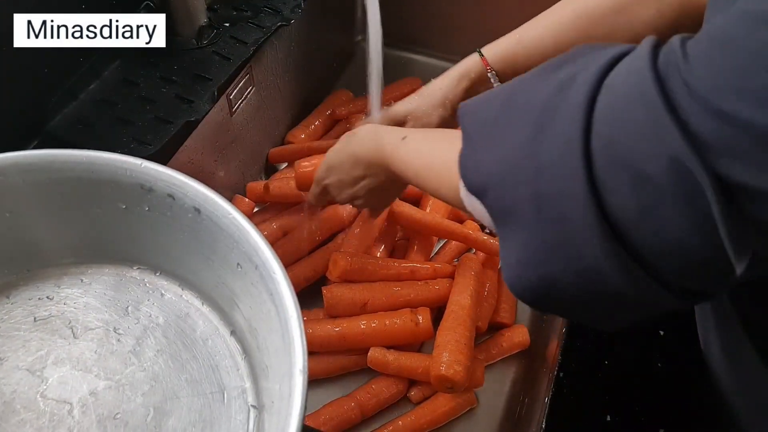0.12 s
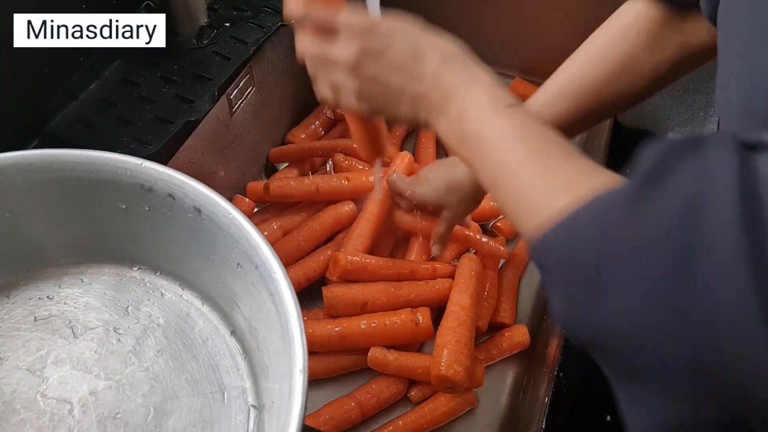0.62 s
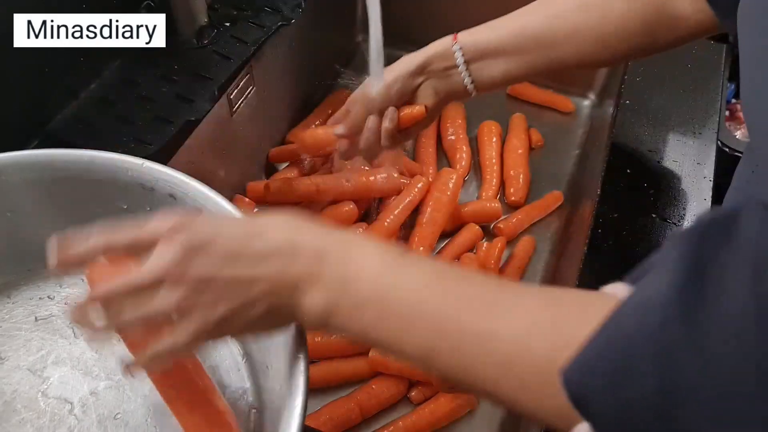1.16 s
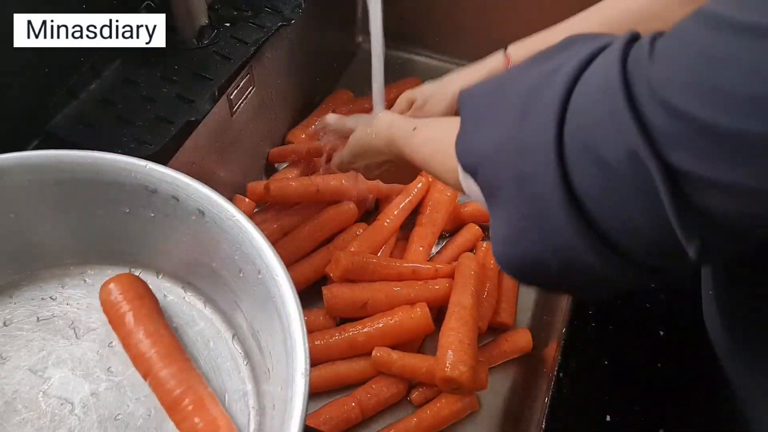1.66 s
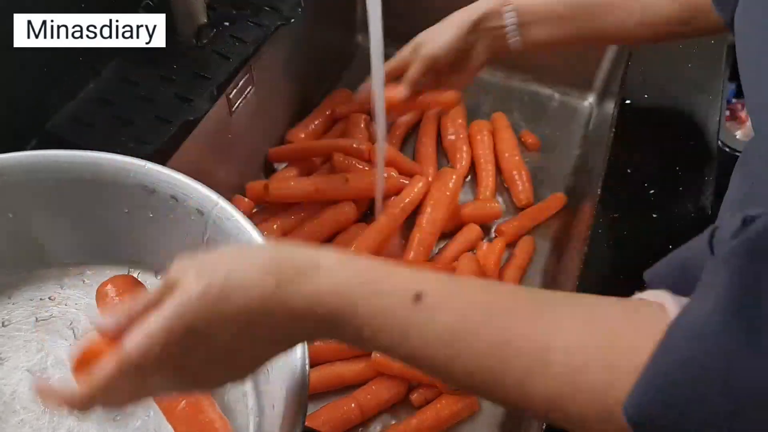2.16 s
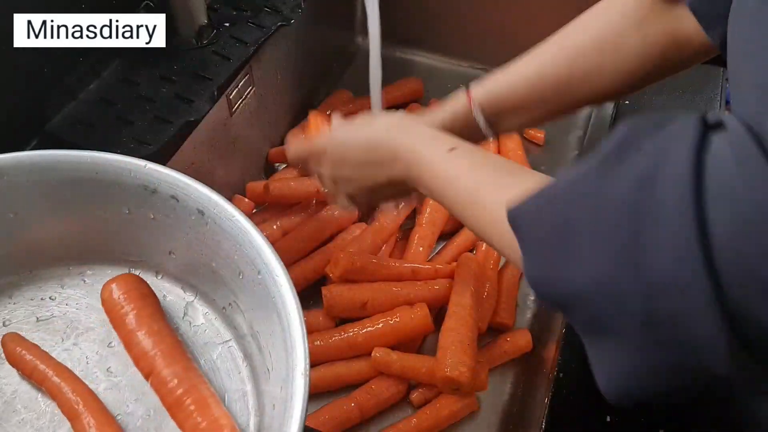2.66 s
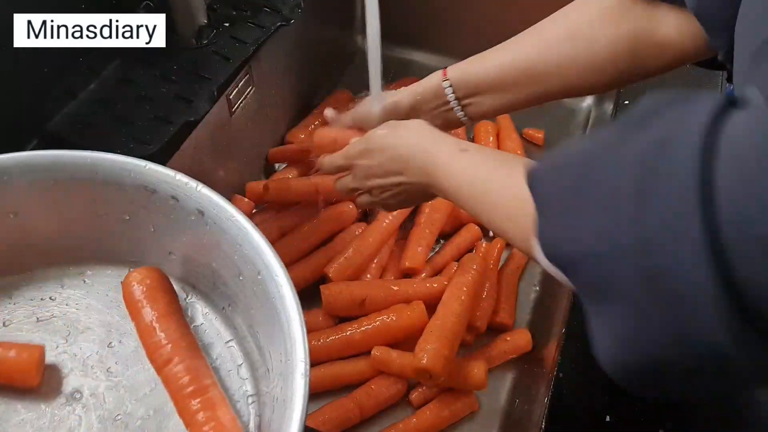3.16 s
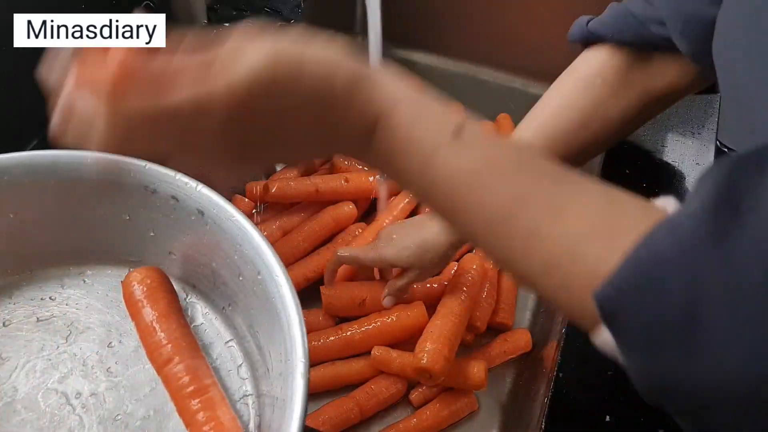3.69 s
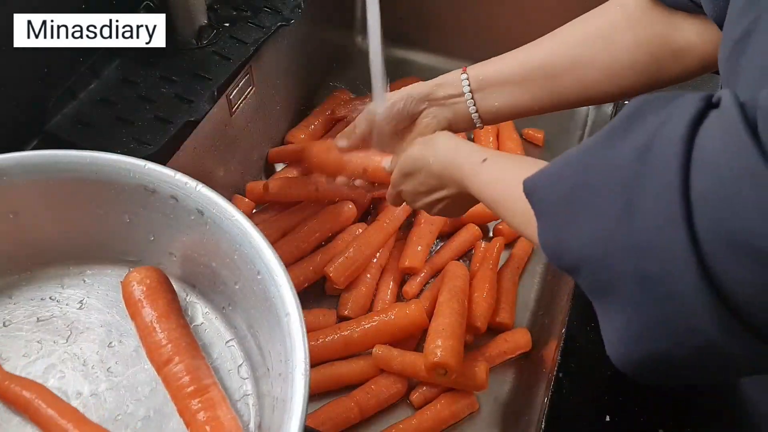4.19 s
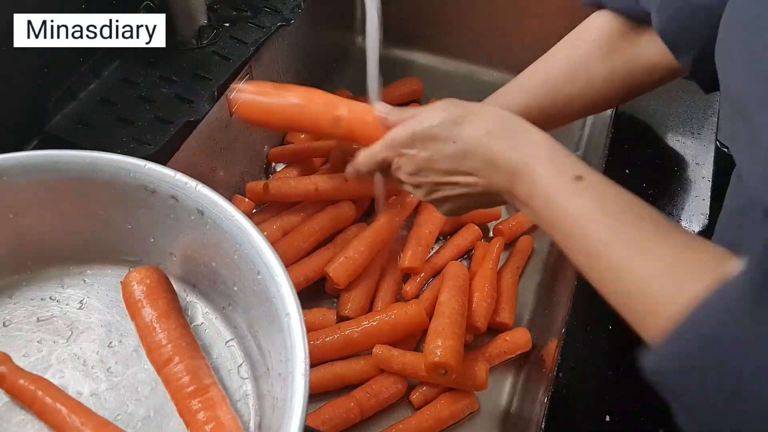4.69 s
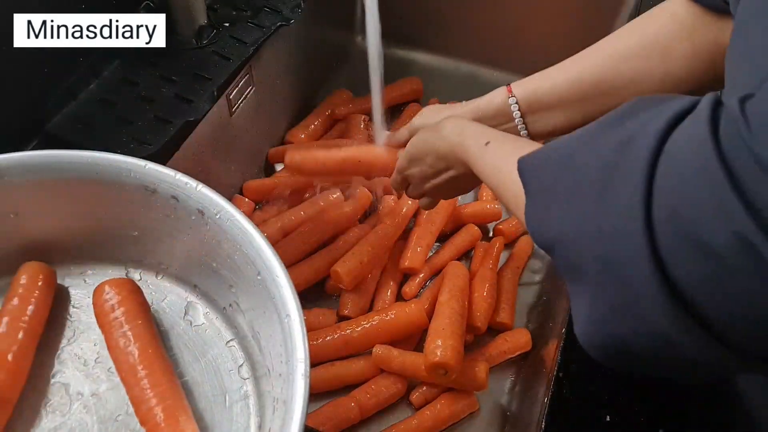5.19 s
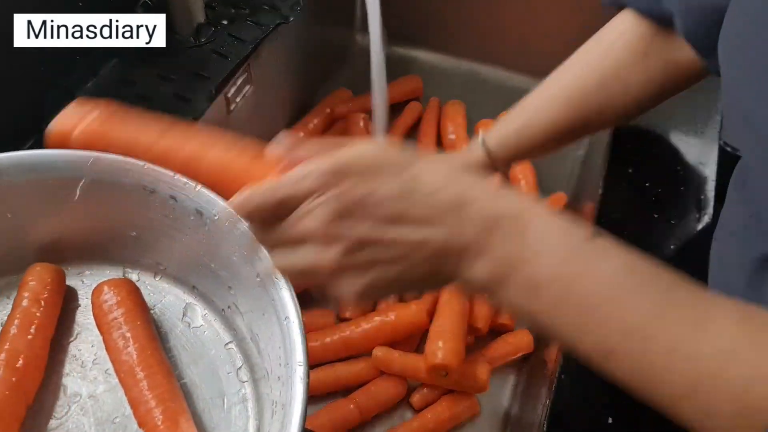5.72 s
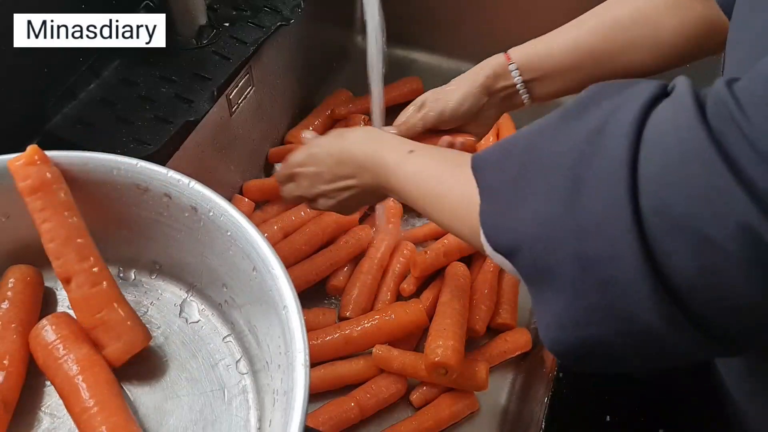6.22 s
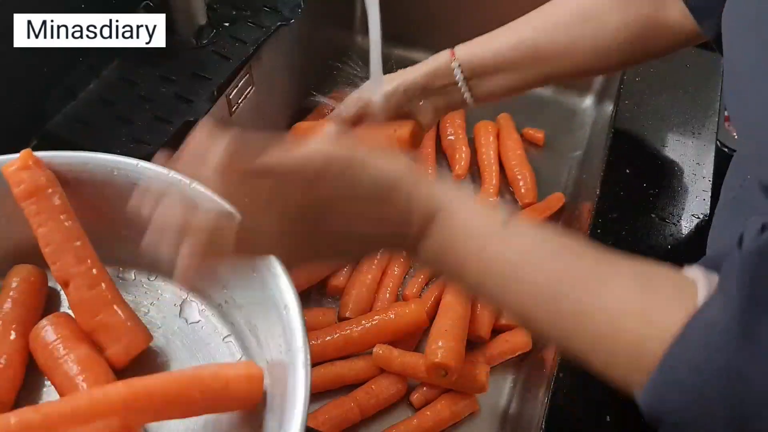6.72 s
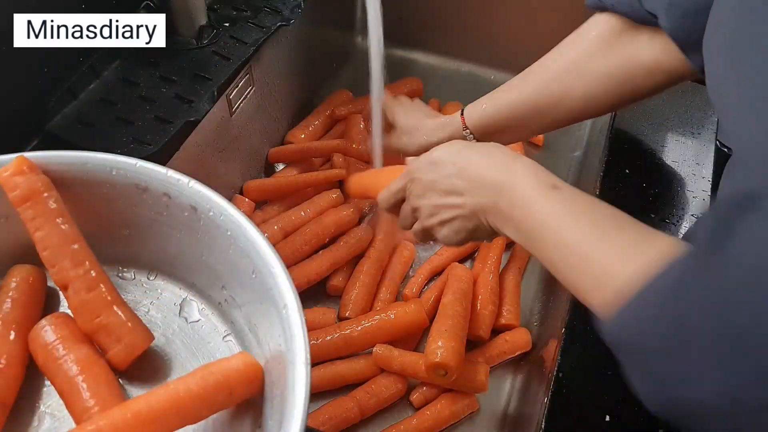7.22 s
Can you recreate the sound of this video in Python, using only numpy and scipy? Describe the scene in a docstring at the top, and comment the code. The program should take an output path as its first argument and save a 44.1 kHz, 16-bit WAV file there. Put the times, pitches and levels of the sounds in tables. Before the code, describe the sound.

For the first 1.4 s the tap is very faint, a thin distant hiss with tiny bubbles and barely audible pot bumps. Then the level leaps and a bright, dense rush of water fills the stereo field, staying to the end at 7.4 s, surging slightly as hands rinse carrots, with soft gurgle and low drumming of the steel. Carrots fall into a thin metal pot: hollow knocks at 2.2-2.4 s, a clattering bounce and roll at 3.0-3.2, another cluster at 3.8-4.0, thuds at 4.9-5.1, clunks at 5.9-6.0, and a strong hit near 6.8. Each is short and damped, with a low boom. Crisp sprays flick off the hands, busiest at 3.8-4.9 and 5.6-6.8, the strongest with the 6.8 hit. Rising bubble bloops appear around 2.0, 3.75 and 7.3 s. Close microphone, short hard-room reflections.

```python
"""Rinsing carrots at a sink

A tap runs over hands and carrots in a steel sink: coloured noise and swarms of damped sines, with basin drumming.
Bursts of filtered noise splat off the hands; single bubbles are sines that rise in pitch.
Carrots drop into a thin metal pot on the left and knock, bounce and roll: damped modes shaped by each contact.
The whole scene starts faint and jumps up in level after a second and a half."""
import sys
import numpy as np
from scipy import signal
from scipy.fft import rfft, irfft, next_fast_len
from scipy.io import wavfile
from scipy.ndimage import uniform_filter1d, map_coordinates

SR = 44100
rng = np.random.default_rng(int(sys.argv[2]) if len(sys.argv) > 2 else 0)


def bounce(signal):
    """Save signal as a 16-bit WAV file at the path given by the first command-line argument."""
    frames = np.transpose(np.atleast_2d(signal))
    limited = np.clip(frames, -1, 1)
    pcm = np.round(limited * 32767).astype(np.int16)
    wavfile.write(sys.argv[1], SR, pcm)


def convert_level_to_amplitude(level_db):
    """Map a level in decibels to its linear amplitude factor."""
    exponent = np.asarray(level_db, float) / 20
    return 10 ** exponent


N = 324576


def unit(x):
    """Scaled to rms 1."""
    return x / np.sqrt(np.mean(x ** 2) + 1e-20)


def along(points, hz):
    """(Hz, value) points read on a log frequency axis."""
    point_hz, value = np.transpose(points)
    return np.interp(np.log(hz + 1), np.log(point_hz + 1), value)


def wobble(knots_per_s):
    """A smooth random curve through normal knots."""
    knots = rng.standard_normal(int(N * knots_per_s / SR) + 4)
    return map_coordinates(knots, [np.arange(N) * knots_per_s / SR])


# left-right likeness: pitch_hz, likeness (1 = identical)
LIKENESS = [(25, 0.9), (70, 0.95), (180, 1), (300, 0.91), (550, 0.95), (1650, 0.23), (4970, 0.18),
            (15000, 0.026)]


def likeness_angle(hz):
    """Mid-side mixing angle that gives the left-right likeness at each frequency."""
    return np.arccos(np.clip(along(LIKENESS, hz), 0, 1)) / 2


def paired(pair, spectrum):
    """Two unrelated signals coloured and mixed into left and right, rms 1."""
    size = next_fast_len(N + 8192)
    hz = np.fft.rfftfreq(size, 1 / SR)
    angle = likeness_angle(hz)
    coloured = rfft(pair, size) * convert_level_to_amplitude(along(spectrum, hz))
    mid, side = irfft(coloured * [np.cos(angle), np.sin(angle)], size)[:, :N]
    return unit(np.array([mid + side, mid - side]))


def patchy(depth_db):
    """Two noises sharing small patches of random gain in time and pitch."""
    z = signal.stft(rng.standard_normal((2, N)), nperseg=256)[2]
    field = uniform_filter1d(rng.standard_normal(z.shape[1:]), size=9, axis=0)
    field = uniform_filter1d(field, size=7, axis=1)
    return unit(signal.istft(z * convert_level_to_amplitude(depth_db * unit(field)), nperseg=256)[1][:, :N])


def bubbles(count, centre_hz, spread, cycles, size_db):
    """Damped sines that rise in pitch as each bubble nears the surface; two unrelated swarms."""
    when, pitch, size, side = rng.random((count, 4)).T[..., None]
    hz = centre_hz * np.exp(spread * (2 * pitch - 1))
    k = np.arange(700)
    u = k / SR * hz / cycles  # time in decay constants
    tone = np.sin(2 * np.pi * cycles * u * (1 + 0.017 * u))
    envelope = np.exp(-u) * (1 - np.exp(-5 * u))
    wave = convert_level_to_amplitude(-size_db * np.log(size + 0.0033)) * tone * envelope
    wave = wave * np.hanning(2 * len(k))[len(k):]
    at = (when * (N - len(k))).astype(int) + k + N * (side > .5)
    return unit(np.bincount(at.ravel(), wave.ravel(), 2 * N).reshape(2, N))


# stream breaking on hands and carrots: time_s, splash_db, droplet_fineness_db
FLOW_CURVE = [(0, -68.5, -2), (.1, -63, -7), (.27, -66.5, -6), (.53, -61, -1.5), (.58, -69, -8.5),
              (.61, -59, 0), (.79, -60, -8), (.93, -64, -4.5), (1.2, -60, -8), (1.27, -63.5, -5),
              (1.42, -63.5, -8), (1.43, -43, 2), (1.48, -44.5, 2.5), (1.61, -44, 2), (1.97, -41.5, -2.5),
              (2.09, -41.5, 0.5), (2.27, -40.5, 0.5), (2.47, -44, 3.5), (2.7, -45, 0.5), (3.06, -41.5, 1.5),
              (3.26, -46.5, 2), (3.48, -43, 0), (3.64, -41, -0.5), (4.06, -43.5, 5.5), (4.62, -42.5, 0.5),
              (4.81, -41.5, 1.5), (5.33, -43, 1.5), (5.74, -42.5, 3.5), (6.09, -43, 1), (6.68, -40.5, 4),
              (7.11, -42, 1), (7.36, -41, 2)]
# layer colours: pitch_hz, density_db (relative, per Hz)
SPRAY_COLOUR = [(1060, -15.5), (1800, -4), (1960, -15.5), (2150, -3), (2620, -1.5), (3400, -1),
                (3770, -3.5), (4420, -1.5), (5940, -2.5), (7000, -5), (9100, -11), (15400, -120)]
FIZZ_COLOUR = [(3530, -26), (6000, -3.5), (7740, -2.5), (8370, -0.5), (10700, -3.5), (11600, -5),
               (12800, -2), (15100, -4), (16000, -16)]
GURGLE_COLOUR = [(380, -33), (650, -6.5), (907, -7), (1040, -3), (1240, -11.5), (1920, -6), (2100, 0.5),
                 (2730, -13), (4620, -120)]
FAINT_GURGLE_COLOUR = [(240, -58), (400, -29), (1160, -6.5), (1230, -7), (1340, -11), (1460, -7),
                       (2100, -15), (2730, -52), (4620, -120)]
DRUM_COLOUR = [(94, -30), (160, -9.5), (216, 1.5), (291, -8), (366, -18.5), (496, -5.5), (552, -19),
               (650, -12.5), (840, -29), (1430, -120)]
RUMBLE_COLOUR = [(15, -48), (25, -29), (43, -25), (70, -10), (78, -8), (91, 5), (160, -3), (210, -53),
                 (350, -120)]
JUMP_S = 1.425
USUAL_DB = -43  # splash level at which the layer levels are given
# layer: level_db at the usual splash, gain_db per splash_db
SPRAY_LAW, FIZZ_LAW, GURGLE_LAW = (-44, 0.99), (-42, 0.99), (-54, 0.75)
DRUM_LAW, RUMBLE_LAW = (-53.5, 1.14), (-60.5, 0.64)


def stream():
    """Falling water: hiss with bubbles in it, surging as the hands break the flow."""
    t = np.arange(N) / SR
    time_s, splash_points_db, fine_points_db = np.transpose(FLOW_CURVE)
    splash_db = np.interp(t, time_s, splash_points_db)
    fine_db = np.interp(t, time_s, fine_points_db)

    def follow(law):
        return law[0] + law[1] * (splash_db - USUAL_DB)

    surge_db = 0.25 * wobble(10) + 1.78 * wobble(30)
    spray_bubbles = bubbles(count=5000, centre_hz=3787, spread=0.691, cycles=42, size_db=2.5)
    spray = paired(patchy(1.86) + 0.28 * spray_bubbles, SPRAY_COLOUR)
    fizz_bubbles = bubbles(count=3000, centre_hz=9555, spread=0.56, cycles=35, size_db=2.5)
    fizz = paired(patchy(1.96) + 0.3 * fizz_bubbles, FIZZ_COLOUR)
    # single drops snap on skin and steel
    ticks = paired(bubbles(count=250, centre_hz=5440, spread=0.55, cycles=1.5, size_db=4.0), SPRAY_COLOUR)
    faint_gurgle = paired(patchy(1.3), FAINT_GURGLE_COLOUR)
    full_gurgle = paired(patchy(1.7), GURGLE_COLOUR)
    gurgle = np.where(t < JUMP_S, faint_gurgle, full_gurgle)
    # lumps of water thump the sheet metal
    drum = paired(patchy(0.29), DRUM_COLOUR) * convert_level_to_amplitude(3.2 * wobble(14))
    rumble = paired(patchy(1.8), RUMBLE_COLOUR)

    rock_drum, rock_rumble = rocking(t)
    out = convert_level_to_amplitude(follow(SPRAY_LAW) - fine_db / 2 + 1.14 * surge_db) * (spray + 0.22 * ticks)
    out += convert_level_to_amplitude(follow(FIZZ_LAW) + fine_db / 2 + 1.04 * surge_db) * fizz
    out += convert_level_to_amplitude(follow(GURGLE_LAW) + 0.17 * surge_db) * gurgle
    out += np.hypot(convert_level_to_amplitude(follow(DRUM_LAW)), rock_drum) * drum
    out += np.hypot(convert_level_to_amplitude(follow(RUMBLE_LAW)), rock_rumble) * rumble
    return out


# pot handled and rocking on the counter: start_s, drum_db, rumble_db, hold_s
POT_ROCKS = [(0.755, -88, -62, 0.027), (1.01, -66, -57, 0.031), (1.263, -73, -52, .02),
             (1.354, -51, -51, .05), (1.44, -47, -60, 0.016), (2.093, -61, -56, .2),
             (2.287, -43, -61, 0.03), (2.988, -46, -42, 0.057), (3.86, -41, -40.5, .05),
             (4.08, -48, -63, 0.015), (4.808, -57, -44, .06), (4.94, -38.5, -42, 0.043),
             (5.713, -51, -44.5, .04), (5.894, -34, -45.5, 0.018), (6.164, -48, -63, 0.051),
             (6.528, -40.5, -48, 0.038), (6.818, -52, -42, 0.062), (7.186, -61, -64, 0.026)]
SWELL_DB_PER_S, SETTLE_DB_PER_S = 124, 165


def rocking(t):
    """Gains of drumming and rumble: each rock of the pot swells, holds and settles."""
    start_s, drum_db, rumble_db, hold_s = np.transpose(POT_ROCKS)[..., None]
    swell_db = -SWELL_DB_PER_S * np.maximum(start_s - t, 0)
    settle_db = -SETTLE_DB_PER_S * np.maximum(t - start_s - np.abs(hold_s), 0)
    peak = convert_level_to_amplitude(np.array([drum_db, rumble_db])[..., 0])
    return np.sqrt(peak ** 2 @ convert_level_to_amplitude(swell_db + settle_db) ** 2)


# modes of the pot: pitch_hz, level_db (relative), t60_s
POT_MODES = [(93.8, -9.5, 0.26), (139, -7.5, 0.31), (217.6, 2.5, 0.12), (239.6, 1.5, 0.18), (283, 0, 0.12),
             (460.7, -1.5, 0.11), (523, -7.5, 0.14), (707, -2.5, 0.05), (850.6, 2.5, 0.05), (971, -2, 0.12),
             (1110, -41, 0.14), (1250, -12, 0.027), (1376, -1, 0.057), (1428, -4.5, 0.049),
             (1710, -2.5, 0.052), (1864, -10, 0.097), (2160, -16, 0.21), (2440, 3.5, 0.027),
             (2870, -8, 0.027), (3320, -12, 0.066), (3860, -11, 0.054), (3946, -8, 0.064),
             (4530, -9, 0.016)]
# carrots on the pot: start_s, level_db (relative); thud_db, wall_db, crack_db (against level_db)
CARROT_KNOCKS = [(0.972, -49, 3, -20, -9), (1.205, -45, 6, -11, -3.5), (1.288, -29, 1.5, 1.5, -10.5),
                 (1.431, -40, 6.5, -2, -17), (2.111, -42.5, 6.5, -14, -1), (2.157, -23.5, -14, -34, -26),
                 (2.241, -13.5, -18, -13, -20), (2.255, -14, -13.5, -22, -21), (2.325, -29.5, -6, -16, -22),
                 (2.393, -5, -36, -5.5, -4.5), (2.424, -18, -18, 1.5, -18), (2.969, -13, -10.5, -7.5, -15),
                 (3, -14.5, -21, -9, -31), (3.018, -30, 0, 7.5, -20), (3.045, -18, -12.5, -27, -22),
                 (3.077, -23.5, -18, -10, -23), (3.116, -11.5, -26, 4.5, -5), (3.125, -19, -11.5, 1, -2.5),
                 (3.155, -17.5, -37, -0.5, -18), (3.162, -11, -24.5, -14, -18),
                 (3.185, -19.5, -30, -5, -18), (3.805, -43.5, 9, -9, -1), (3.843, -16.5, -2.5, -11, -20.5),
                 (3.886, -8, -13, -4, -20), (3.926, -9.5, -31, 1, -9), (3.941, -22.5, -10, 14, -24),
                 (3.95, -33, -3, -4, -16), (3.967, -16.5, -16, -3, -14), (3.98, -14.5, -13.5, 6.5, 1),
                 (4.015, -17.5, -16, -3.5, -11.5), (4.109, -33.5, -14, -16, -20), (4.795, -49.5, 13, -7, 0),
                 (4.858, -48, 11.5, -6, -3), (4.922, -16, 0, -16, -19), (4.937, -22.5, -6, 0, -12),
                 (4.953, -21.5, -1, -14, -17), (4.981, -19.5, -16, -12, -24), (5.064, -14.5, -17, -11, -19),
                 (5.073, -8.5, -13.5, -7.5, -15.5), (5.699, -32, 3, -14, -10), (5.734, -40.5, -7, -5, 0),
                 (5.865, -10, -10.5, -2, -18), (5.877, -15.5, -30, -1, -7), (5.889, -9.5, -9.5, -16, -16.5),
                 (6.007, -4.5, -24.5, -10, -27.5), (6.028, -26, -9, -15, -31), (6.514, -43, 8.5, -17, -11),
                 (6.71, -19.5, -18, -10, -30), (6.72, -21, -6.5, -6, -22), (6.753, -13.5, -31, -13, -34),
                 (6.778, -0.5, -22, -11, -22.5), (6.91, -36, -2.5, -19, -17), (7.328, -27, -2, -12, -16)]
RING_DB, RING_PER_DB = -15, -.12  # a soft contact leaves relatively more ring


def rings(hz, db, t60_s, t, lead_s):
    """Damped sines with random phases, the left channel's ahead of the right's."""
    channel = np.array([[.5], [-.5]])[..., None]
    phase = rng.uniform(-1.34, 0.19, hz.shape)
    lead = 2 * np.pi * hz * lead_s * rng.uniform(0.19, 1.7, hz.shape)
    tone = np.sin(2 * np.pi * hz * t + phase + lead * channel)
    return np.sum(convert_level_to_amplitude(db - 60 * t / t60_s) * tone, axis=1)


def pot():
    """While the carrot touches, the modes give a short knock; a dense rattle and weaker ring are left."""
    out, t = np.zeros((2, N + SR)), np.arange(SR // 4) / SR
    hz, mode_db, t60_s = np.transpose(POT_MODES)[..., None]
    short = t[:SR // 10]
    for start_s, level_db, thud_db, wall_db, crack_db in CARROT_KNOCKS:
        ring_db = RING_DB + RING_PER_DB * level_db
        contact = [(300, thud_db + 3.0), (450, 0.5 * thud_db + 3), (700, 1.5), (1050, 3.5),
                   (1300, wall_db + 5.5), (2000, wall_db + 6.5),
                   (2400, crack_db + 11.5), (4500, crack_db + 11.0), (9000, crack_db - 6)]
        struck_db = mode_db + along(contact, hz)
        left_db = np.where(hz < 350, -10.5, ring_db - 5.5)  # the wide bottom always booms on
        blow_db = struck_db + left_db + rng.normal(0, 3.3, hz.shape)
        blow = rings(hz, blow_db, t60_s, t, lead_s=0.00022)
        knock_db = struck_db - 9.5 + rng.normal(0, 3.3, hz.shape)
        knock = rings(hz, knock_db, 0.036 + 15 / hz, short, lead_s=0.0001)
        dense_hz = np.geomspace(350, 9000, num=40)[:, None] * np.exp(rng.normal(0, .04, (40, 1)))
        dense_db = along(contact, dense_hz) + ring_db - 8.5
        rattle = rings(dense_hz, dense_db, 0.037 + 40 / dense_hz, short, lead_s=.00012)
        blow[:, :len(short)] += knock * np.exp(-(short / 0.0068) ** 2) + rattle
        onset = 1 - np.exp(-t / 0.0013)
        out[:, round(start_s * SR):][:, :len(t)] += convert_level_to_amplitude(level_db) * blow * onset
    return out[:, :N] * convert_level_to_amplitude([[.3], [-.3]])  # dB: left slightly louder


# spray off the hands: start_s, level_db (relative), centre_hz
SPRAY_BURSTS = [(0.53, -43, 3800), (0.598, -44.5, 4720), (1.556, -28, 3620), (1.712, -35, 6270),
                (1.915, -26.5, 5200), (1.95, -27, 6250), (2.655, -34, 5460), (2.862, -33, 8330),
                (3.773, -26.5, 6210), (4.051, -26.5, 5630), (4.06, -28, 5280), (4.175, -26.5, 6410),
                (4.248, -28, 4100), (4.311, -28, 5200), (4.357, -25, 8450), (4.394, -27, 9600),
                (4.454, -27.5, 8600), (4.645, -25.5, 4800), (4.783, -25, 7600), (4.867, -28.5, 8430),
                (5.213, -32, 7100), (5.55, -34, 7710), (5.649, -26.5, 8250), (5.684, -28, 3130),
                (5.765, -24.5, 7760), (6.217, -21, 8000), (6.305, -30, 6430), (6.461, -27, 5930),
                (6.67, -35, 5280), (6.699, -30, 7120), (6.781, -14.5, 6300), (6.914, -41, 8600),
                (7.18, -31, 4540)]
SPLAT_T60_S = 0.05


def splats():
    """Each burst is a puff of droplets: decaying noise around one pitch."""
    out, t = np.zeros((2, N + SR)), np.arange(SR // 10) / SR
    shape = convert_level_to_amplitude(-60 * t / SPLAT_T60_S) * (1 - np.exp(-t / 0.0019))
    for start_s, level_db, centre_hz in SPRAY_BURSTS:
        edges_hz = [centre_hz / 1.12, min(centre_hz * 1.21, 20000)]
        band = signal.butter(1, edges_hz, "band", fs=SR, output="sos")
        puff = rng.standard_normal(len(t)) + 1.2 * rng.standard_normal((2, len(t)))
        burst = shape * unit(signal.sosfilt(band, puff))
        out[:, round(start_s * SR):][:, :len(t)] += convert_level_to_amplitude(level_db - 3.0) * burst
    return out[:, :N]


# single bubbles that stand out: start_s, level_db (before onset and decay), start_hz
SINGLE_BUBBLES = [(0.069, -52, 1480), (0.093, -50, 1250), (1.99, -33.5, 2440), (2.051, -35.5, 2800),
                  (3.433, -37, 1665), (3.75, -26.5, 2120), (4.644, -35.5, 2460), (6.137, -38, 3200),
                  (7.006, -36.5, 1705), (7.313, -32.5, 1850)]
BLOOP_T60_S = 0.055


def bloops():
    """A larger bubble: a soft start and a slowly rising, dying tone."""
    out, t = np.zeros(N + SR), np.arange(SR // 10) / SR
    onset = 1 - np.exp(-t / 0.0017)
    for start_s, level_db, start_hz in SINGLE_BUBBLES:
        tone = np.sin(2 * np.pi * start_hz * t * (1 + 0.74 * t))
        out[round(start_s * SR):][:len(t)] += convert_level_to_amplitude(level_db - 60 * t / BLOOP_T60_S) * tone * onset
    return out[:N]


# reverberation: pitch_hz, t60_s
KITCHEN_DECAY = [(150, 0.28), (1000, 0.21), (4000, 0.28), (12000, 0.15)]


def kitchen(x):
    """Hard walls answer; each pitch dies at its own speed, and the bass is alike left and right."""
    hz, t, z = signal.stft(rng.standard_normal((2, SR // 3)), SR, nperseg=256)
    angle = likeness_angle(hz)[:, None]
    z = z[0] * np.cos(angle) + z[1] * np.sin(angle) * np.array([1, -1])[:, None, None]
    decay = convert_level_to_amplitude(-60 * t / along(KITCHEN_DECAY, hz)[:, None])
    tail = signal.istft(z * decay, SR, nperseg=256)[1]
    delayed = np.pad(x, ((0, 0), (200, 0)))
    return signal.fftconvolve(delayed, tail / np.linalg.norm(tail[0]), axes=1)[:, :N]


def scene():
    """Pot, splats and bloops sound in the kitchen over the stream; the pot's knocks carry no deep bass."""
    no_bass = signal.butter(3, 85, "high", fs=SR, output="sos")
    near = signal.sosfilt(no_bass, pot()) + splats() + bloops()
    return near + convert_level_to_amplitude(-11.5) * kitchen(near) + stream()


def band_limit(x):
    """A steep low-pass at the top of the band."""
    return signal.sosfilt(signal.butter(12, 17090, fs=SR, output="sos"), x)


def record(dry):
    """The band ends sharply at 15.9 kHz."""
    passed = np.fft.rfftfreq(N, 1 / SR) < 15900
    mix = irfft(rfft(dry) * passed, N)
    return band_limit(mix)


dry = scene()
out = record(dry)
bounce(out)
```